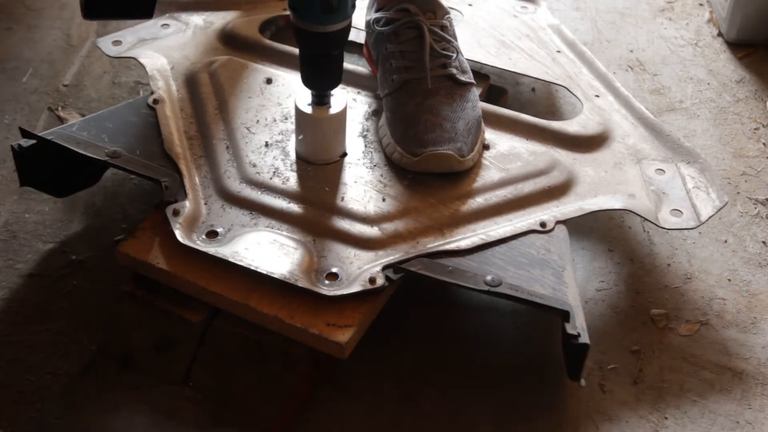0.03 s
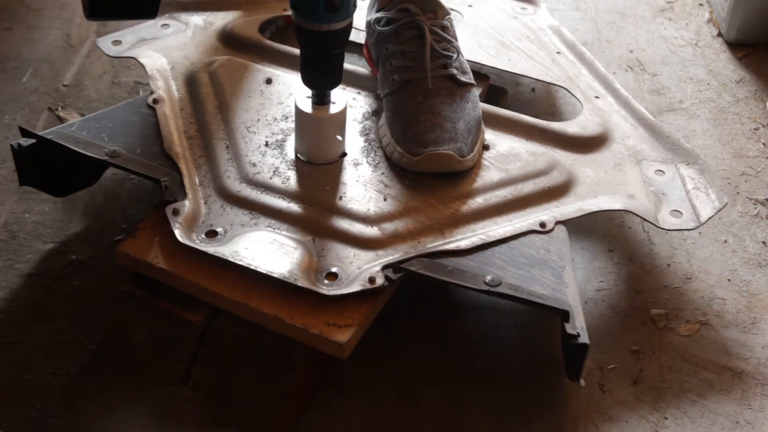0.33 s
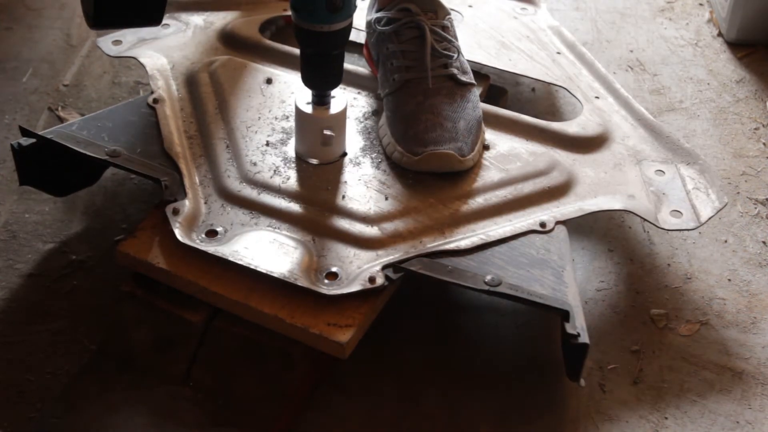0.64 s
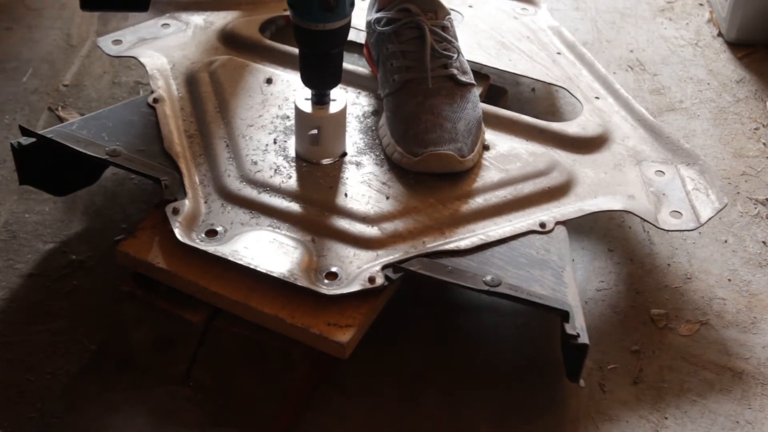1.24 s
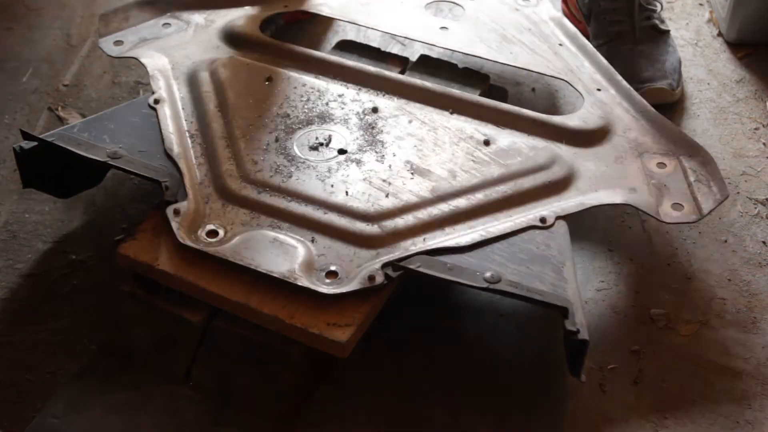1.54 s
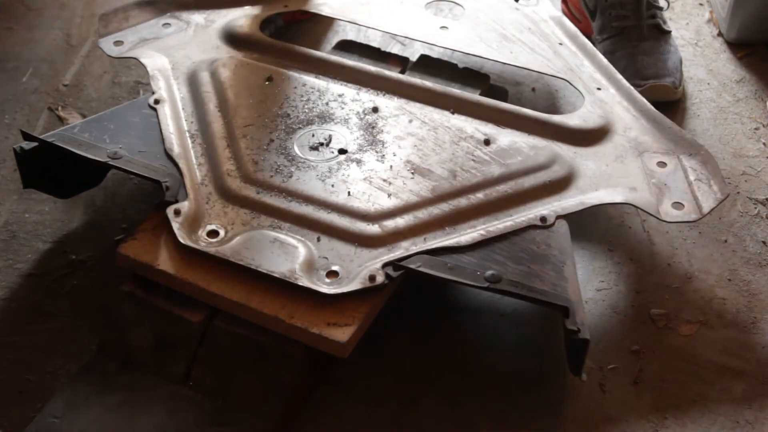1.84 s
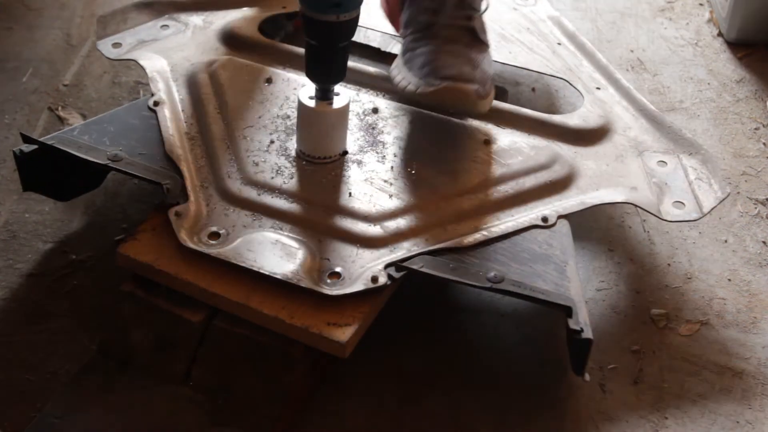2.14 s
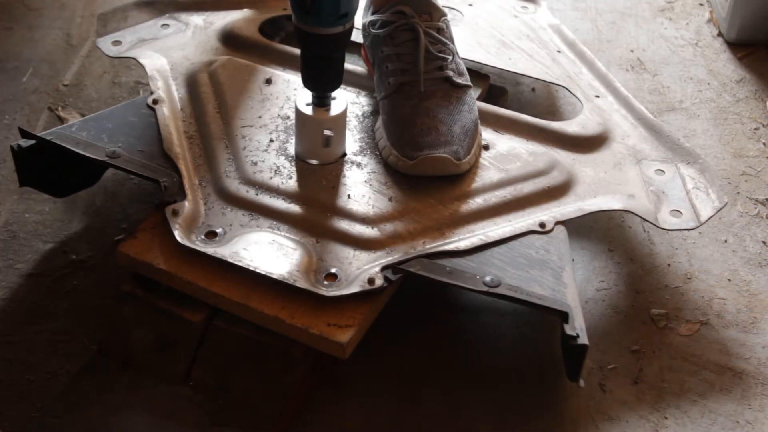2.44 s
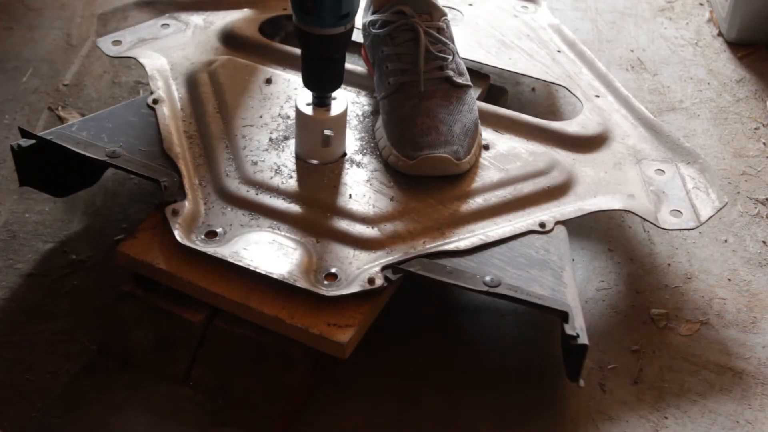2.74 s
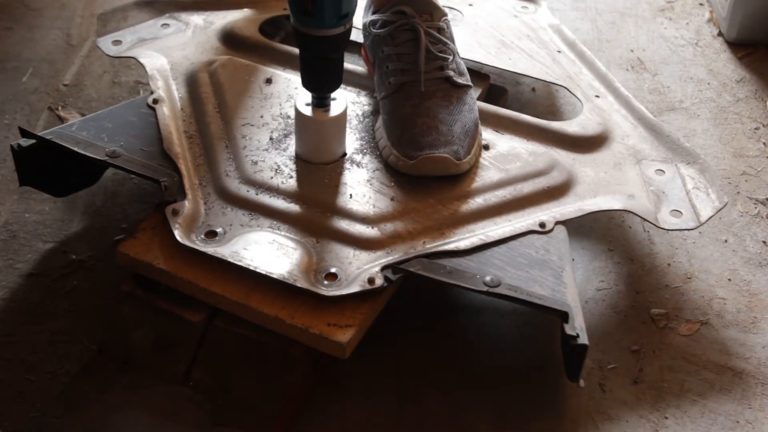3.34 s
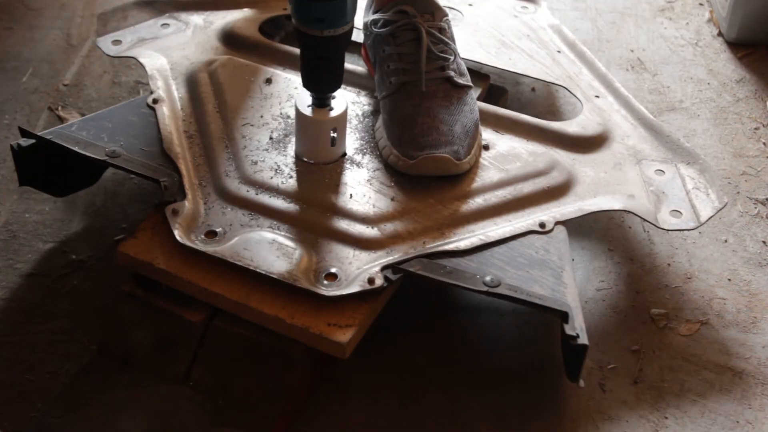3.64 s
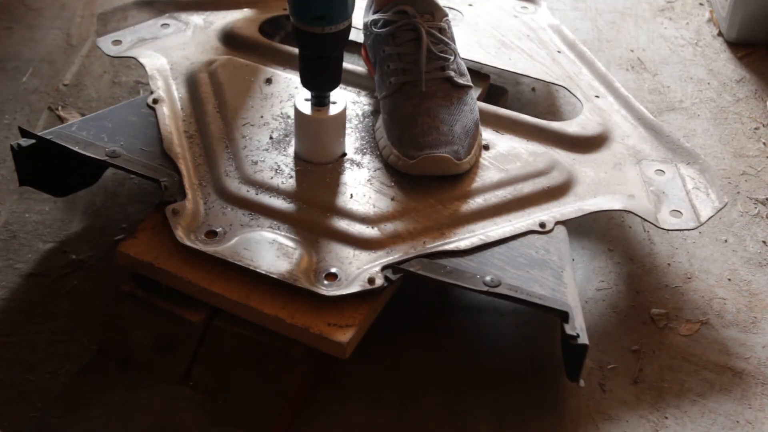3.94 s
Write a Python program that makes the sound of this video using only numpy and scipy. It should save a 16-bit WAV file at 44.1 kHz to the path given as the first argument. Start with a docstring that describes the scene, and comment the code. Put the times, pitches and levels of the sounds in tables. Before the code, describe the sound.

Hole saw grinding through a metal panel, lifting briefly, then cutting on and squealing.

```python
"""Hole saw in sheet metal

A hole saw on a power drill grinds into a panel in a garage. Its teeth catch and scrape, exciting
the modes of saw and panel. Lifted, it clinks by impact and squeals by stick-slip friction; then it
cuts on with a growing whine until it binds in a run of squeals. A machine whirrs behind."""
import sys
import numpy as np
from scipy import signal
from scipy.fft import rfft, irfft
from scipy.io import wavfile
from scipy.ndimage import uniform_filter1d

SR = 44100
rng = np.random.default_rng(int(sys.argv[2]) if len(sys.argv) > 2 else 0)


def transcribe(signal):
    """Save signal, clipped to [-1, 1], as a 16-bit WAV file at the path in sys.argv[1]."""
    frames = np.atleast_2d(signal).T
    limited = np.clip(frames, -1, 1)
    pcm = np.round(limited * 32767).astype(np.int16)
    wavfile.write(sys.argv[1], SR, pcm)


N = 176400
T = np.arange(N) / SR
WHINE_FLUTTER_DB, WHINE_FLUTTER_HZ = 2.5, 90


def amp(db):
    """Amplitude ratio of a level in decibels."""
    return 10 ** (np.asarray(db) / 20)


def unit(x):
    """Normalisation to rms 1."""
    return x / np.sqrt(np.mean(abs(x) ** 2) + 1e-20)


def add(mix, start, sound):
    """Superposition of a sound on the mix from a start in seconds."""
    part = mix[max(round(start * SR), 0):][:len(sound)]
    part += sound[:len(part)]


def drift(hz):
    """Random modulation: noise low-passed at hz, rms 1."""
    f = np.fft.rfftfreq(N, 1 / SR)
    return unit(irfft(rfft(rng.standard_normal(N)) / (1 + (f / hz) ** 4), N))


def colour(x, spectrum):
    """Spectral shaping along a curve over log frequency, to rms 1."""
    hz, db = np.transpose(spectrum)
    f = np.fft.rfftfreq(N, 1 / SR)
    gain = amp(np.interp(np.log(f + 1), np.log(hz), db))
    return unit(irfft(rfft(x) * gain, N))


def band(x, hz, width):
    """Resonance, modelled as a steep band-pass filter."""
    edges = np.clip([hz - width / 2, hz + width / 2], 20, SR / 2 - 100)
    return signal.sosfilt(signal.butter(2, edges, "bandpass", fs=SR, output="sos"), x)


def hiss(hz, width):
    """Response of one resonance to white noise, rms 1."""
    return unit(band(rng.standard_normal(N), hz, width))


def patchy(x):
    """Amplitude modulation by band: narrow bands flare and fade at random."""
    spectra = signal.stft(x, nperseg=256)[2]
    field = uniform_filter1d(rng.standard_normal(spectra.shape), size=2, axis=0)
    field = uniform_filter1d(field, size=10, axis=1)
    return signal.istft(spectra * amp(2.5 * unit(field)))[1][:N]


def pressure():
    """Friction noise grows with contact force: the push of each cut, or a single tooth's bite."""
    # grinding level under the push, one curve per cut: t/s, level/dB
    cuts = [
        [(0, -42), (.07, -42.5), (.14, -45.5), (.33, -43), (.42, -45.5), (.52, -43), (.875, -46), (.895, -50),
         (.92, -51), (.98, -44.5), (1.055, -49.5), (1.078, -55), (1.13, -46.5), (1.25, -44.5), (1.295, -39.5),
         (1.35, -44.5), (1.43, -40.5), (1.535, -44), (1.56, -53)],
        [(2.283, -44), (2.35, -39), (2.41, -42.5), (2.455, -39.5), (2.62, -41.5), (3.0, -41.5), (3.4, -42),
         (3.68, -42.5), (3.683, -34), (3.712, -78)],
        [(3.755, -55), (3.758, -40.5), (3.8, -42), (3.83, -44), (3.86, -41.5), (3.96, -43), (4.0, -41.5)],
    ]
    # teeth bite as the saw skips in its groove: t/s, level/dB
    tooth_bites = [(0.846, -36.5), (0.885, -41.5), (0.934, -45), (.945, -41), (.958, -40), (.969, -40),
                   (.976, -38), (.996, -38), (1.007, -41), (1.021, -44), (1.047, -38.5), (1.059, -41),
                   (1.071, -46.5), (1.143, -40)]
    bite_s = 0.0054
    push = sum(amp(np.interp(T, *np.transpose(cut), left=-np.inf, right=-np.inf)) for cut in cuts)
    bites = sum(amp(db) * (abs(T - centre) < bite_s / 2) for centre, db in tooth_bites)
    return np.maximum(push, uniform_filter1d(bites, size=64))


def scraping(catches):
    """Friction noise: its power jumps at each catch and decays exponentially to a steady rub."""
    decay_s, rub = 0.0008, 0.99
    power = signal.lfilter([1], [1, -np.exp(-2 / (decay_s * SR))], catches ** 2)
    mean_power = abs(uniform_filter1d(power, size=3000)) + 1e-9
    return np.sqrt(power / mean_power + rub ** 2) * rng.standard_normal(N)


def grinding():
    """Forced vibration: each tooth catch drives its own mix of modes, which shift as the saw turns."""
    # modes of saw and panel: f/Hz, bandwidth/Hz, relative level/dB
    steel_modes = [(4445, 590, -24), (5503, 230, -19), (5824, 210, -23), (7235, 120, -20),
                   (8376, 380, -8.5), (9030, 240, -13), (9420, 280, -11), (10350, 190, -18),
                   (11580, 180, -15), (13030, 260, -18), (13900, 370, -13.5), (15000, 820, -16),
                   (15100, 150, -19.5)]
    # broad spectrum of the scraping teeth: f/Hz, relative level/dB
    scrape_spectrum = [(30, -33), (250, -29.5), (700, -33), (1300, -21.5), (3000, -12), (5000, -9),
                       (6600, -6), (8200, 0), (11000, 3.5), (16000, 1)]
    catches_per_s, chatter_hz, chatter_db = 520, 83.2, 6.5
    spread_db, swell_db, wander = 4.5, 2.23, 0.004
    cycles = np.cumsum(chatter_hz * (1 + 0.11 * drift(hz=18))) / SR
    size_db = 2.5 * np.minimum(rng.exponential(1, N), 2.9)
    size_db += chatter_db * np.cos(2 * np.pi * cycles)  # harder once per chatter cycle
    catches = amp(size_db) * (rng.random(N) < catches_per_s / SR)
    sound = amp(-3.5) * colour(patchy(scraping(catches)), scrape_spectrum)
    for hz, width, db in steel_modes:
        blows = catches * amp(spread_db * rng.standard_normal(N))
        ring = band(scraping(blows), hz, width)
        shift = np.exp(2j * np.pi * np.cumsum(hz * wander * drift(hz=20)) / SR)
        shifted = (signal.hilbert(ring) * shift).real
        sound += amp(db) * unit(shifted * amp(swell_db * drift(hz=20)))
    return sound * pressure()


def singing():
    """Resonance: single modes of the panel swell and fade."""
    # swells: t/s, duration/s, level/dB, f/Hz, bandwidth/Hz
    swells = [(0, 0.24, -61.5, 4430, 403), (0.082, 0.047, -48, 5460, 420), (0.246, 0.081, -48.5, 5620, 495)]
    return sum(amp(db) * hiss(hz, width) * np.sin(np.pi * np.clip((T - start) / length, 0, 1))
               for start, length, db, hz, width in swells)


def whirr():
    """Broadband air noise and narrowband tones of a machine, fainter while the saw cuts."""
    # rushing air: f/Hz, relative level/dB
    air_spectrum = [(30, -55), (150, -40), (330, -23), (560, -18), (800, -15), (1000, -2.5), (1400, 4),
                    (2300, 2), (3500, 0.5), (5500, -6.5), (9000, -9), (16000, -14)]
    # machine tones: f/Hz, level before the gain/dB
    machine_tones = [(636, -87.5), (1520, -65), (2929, -76.5), (3343, -68)]
    # gain of air and tones together: t/s, gain/dB
    gain_curve = [(0, -10), (.8, -6.5), (.91, -12.5), (.98, -9), (1.08, -13.5), (1.17, -5.5), (1.3, -3),
                  (1.36, -7), (1.52, -4.5), (1.58, 1.5), (2.28, 1), (2.37, -9), (2.9, -4), (3.65, -2.5),
                  (3.73, 3.5), (3.8, -5), (4, -3)]
    sound = amp(-58) * colour(rng.standard_normal(N), air_spectrum)
    for hz, db in machine_tones:
        waver = 0.93 + (drift(hz=13.5) + 1j * drift(hz=13.5)) / 2
        sound += amp(db) * unit((waver * np.exp(2j * np.pi * hz * T)).real)
    return sound * amp(np.interp(T, *np.transpose(gain_curve)))


def gears():
    """Gear-mesh tones: the labouring drill whines briefly, its pitch gliding with its speed."""
    # whines: t/s, duration/s, level/dB, start f/Hz, end f/Hz
    gear_whines = [(0.116, 0.08, -74, 1562, 1655), (1.035, 0.23, -76.5, 1847, 2210),
                   (1.094, 0.29, -88, 880, 890), (3.27, 0.16, -69, 1215, 1326)]
    out = np.zeros(N)
    for start, length, db, first, last in gear_whines:
        t = np.arange(0, length, 1 / SR)
        phase = 2 * np.pi * np.cumsum(first + (last - first) * t / length) / SR
        envelope = np.sqrt(np.sin(np.pi * t / length))
        add(out, start, amp(db) * unit(envelope * np.sin(phase)))
    return out * amp(WHINE_FLUTTER_DB * drift(WHINE_FLUTTER_HZ))


def bumps():
    """Heavily damped oscillation: the panel bumps on its wooden block."""
    # bumps: t/s, peak level/dB
    panel_bumps = [(.12, -63), (.796, -67), (.91, -65), (0.947, -62), (1.024, -62), (1.073, -58.5),
                   (1.156, -66), (1.314, -62)]
    hz, decay_s = 500, 0.00047
    out, t = np.zeros(N), T[:SR // 4]
    for start, db in panel_bumps:
        add(out, start, amp(db) * np.cos(2 * np.pi * hz * t) * np.exp(-t / decay_s))
    return out


def clinks():
    """Free vibration after impact: steel on steel dies quickly; one ping of the saw cup lingers."""
    # saw strikes panel: t/s, level/dB, centre f/Hz, bandwidth/Hz, decay time/s
    impacts = [(1.592, -27.5, 10900, 4100, 0.0055), (1.624, -34, 8100, 3040, 0.0066),
               (1.724, -52, 9400, 6040, 0.0092), (1.901, -51, 11100, 7000, 0.018),
               (1.931, -40, 12600, 5000, 0.0038), (2.1524, -30, 8900, 2080, 0.0039),
               (2.171, -42, 11100, 8000, 0.0049), (2.206, -43, 4600, 6100, 0.0046),
               (3.745, -42.5, 6600, 4000, 0.0072)]
    rise_s, ping_hz, ping_t60_s = 0.0017, 10200, 0.25
    out, t = np.zeros(N), T[:SR // 4]
    for start, db, hz, width, decay in impacts:
        burst = hiss(hz, width) + 0.23 * hiss(hz=9070, width=15200)
        envelope = np.minimum(t / rise_s, 1) * np.exp(-(t / decay) ** 1.5)
        add(out, start, amp(db) * burst[-len(t):] * envelope)
    ping = np.exp(-np.log(1000) * t / ping_t60_s) * np.sin(2 * np.pi * ping_hz * t)
    add(out, start=1.593, sound=amp(-47) * ping)
    return out


def stick_slip(events, harmonics):
    """Self-excited friction tones bend through three pitches; rough ones jitter and smear into noise."""
    # weighting of the harmonics: f/Hz, relative level/dB
    harmonic_spectrum = [(2500, -4), (6000, -1.5), (9000, 5), (12000, 7), (15000, -8.5)]
    out = np.zeros(N)
    jitter, flutter = 0.066 * drift(hz=380), amp(4.5 * drift(hz=250))
    fuzzes = [drift(hz=676) + 1j * drift(hz=676) for _ in range(harmonics)]
    for start, length, db, first, middle, last, rough in events:
        t = np.arange(0, length, 1 / SR)
        span = (round(start * SR) + np.arange(len(t))) % N
        bend = np.polyfit([0, .5, 1], [first, middle, last], 2)
        hz = np.polyval(bend, t / length) * (1 + rough * jitter[span])
        phase = 2 * np.pi * np.cumsum(hz) / SR
        tone = np.zeros(len(t))
        for k, fuzz in enumerate(fuzzes, 1):
            weight = amp(np.interp(k * hz, *np.transpose(harmonic_spectrum)))
            tone += weight * (np.exp(1j * k * phase) * (1 - rough + rough * fuzz[span])).real
        envelope = np.minimum(np.minimum(t, length - t) / 0.004, 1)  # 4 ms ramps
        add(out, start, amp(db) * unit(tone * flutter[span] * envelope))
    return out


def squeaks():
    """Stick-slip oscillation with a single high partial."""
    # squeaks: t/s, duration/s, level/dB, start f/Hz, middle f/Hz, end f/Hz, roughness (0-1)
    squeak_events = [(1.604, 0.0068, -43, 5700, 5720, 5600, 0.2),
                     (1.906, 0.037, -51.5, 11200, 13700, 14200, 0.2),
                     (3.863, 0.015, -37.5, 5200, 5600, 5500, 0.2),
                     (3.882, 0.0084, -40, 5870, 5800, 5700, .1)]
    return stick_slip(squeak_events, harmonics=1)


def squeals():
    """Stick-slip oscillation rich in harmonics, as the saw lifts or binds."""
    # squeals: t/s, duration/s, level/dB, start f/Hz, middle f/Hz, end f/Hz, roughness (0-1)
    squeal_events = [(1.635, 0.0151, -33.5, 3050, 3110, 2500, 0),
                     (2.037, 0.012, -46.5, 2700, 2760, 2500, 1),
                     (2.053, 0.028, -40.5, 2580, 2323, 2580, 0.15),
                     (2.176, 0.023, -48, 3220, 2800, 2670, 0.54),
                     (3.756, 0.018, -39.5, 2920, 2513, 3160, 0.07),
                     (3.852, 0.016, -39.5, 2535, 2630, 2980, 0.4),
                     (3.893, 0.016, -38.5, 2880, 3260, 3330, 0.16),
                     (3.912, 0.0093, -40.5, 3650, 3594, 3620, 0), (3.925, 0.02, -37, 3060, 2885, 2290, 0.2)]
    return stick_slip(squeal_events, harmonics=6)


def thud():
    """A soft impact excites a low, damped resonance: a shoe comes down on the panel."""
    decay_s = 0.027
    out, t = np.zeros(N), T[:SR // 4]
    ring = hiss(hz=383, width=98)[-len(t):] * np.exp(-t / decay_s)
    add(out, start=2.208, sound=amp(-73.5) * ring)
    return out


def whine():
    """Periodic vibration of the loaded saw: a rough tone whose harmonics grow as the cut deepens."""
    # course of the whine: t/s, f/Hz, fundamental level/dB, octave level/dB
    whine_curve = [(2.902, 1485, -77, -88), (2.991, 1458, -59, -62.5), (3.071, 1440, -68, -72),
                   (3.127, 1481, -62, -58), (3.19, 1406, -65.5, -72), (3.291, 1334, -69, -70),
                   (3.351, 1394, -65, -70), (3.411, 1472, -60, -52.5), (3.519, 1447, -60.5, -57),
                   (3.611, 1464, -59, -54.5), (3.681, 1431, -56, -56), (3.726, 1432, -62, -42.5),
                   (3.78, 1410, -63.5, -66), (3.918, 1373, -67, -61), (4.0, 1392, -64, -101)]
    times, hz, fundamental_db, octave_db = np.transpose(whine_curve)
    pitch = np.interp(T, times, hz) * (1 + 0.00276 * drift(WHINE_FLUTTER_HZ))
    phase = 2 * np.pi * np.cumsum(pitch) / SR
    out = np.zeros(N)
    for k, db in enumerate([fundamental_db, octave_db, octave_db - 17], 1):
        level = np.interp(T, times, db, left=-np.inf) + WHINE_FLUTTER_DB * drift(WHINE_FLUTTER_HZ)
        out += np.sqrt(2) * amp(level) * np.sin(k * phase)
    return out


def scene():
    """Superposition of all sources at one point."""
    panel = grinding() + singing() + squeals() + squeaks() + bumps() + clinks() + thud()
    return (panel + whine() + gears() + whirr())[None]


def record(dry):
    """Band limiting by a linear-phase low-pass filter."""
    lowpass = signal.firwin(511, cutoff=15800, window=("kaiser", 9), fs=SR)
    return signal.oaconvolve(dry, lowpass[None], "same")


dry = scene()
out = record(dry)
transcribe(out)
```